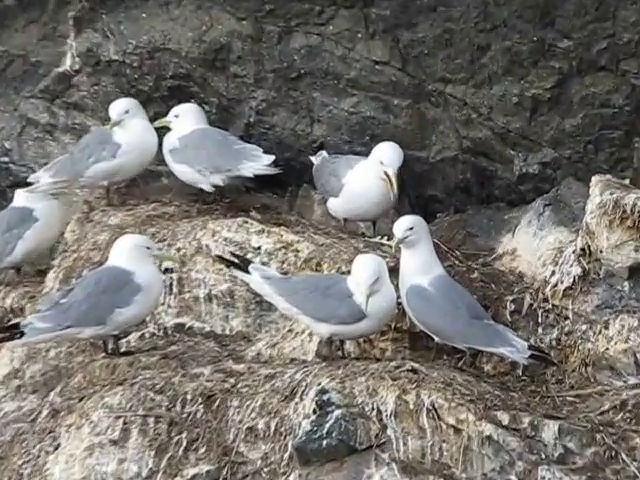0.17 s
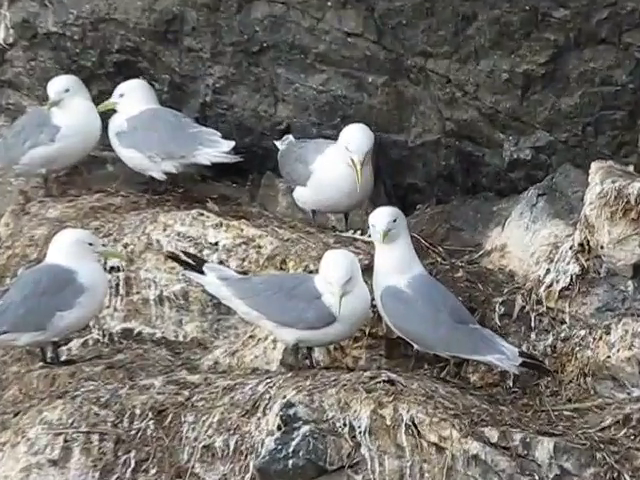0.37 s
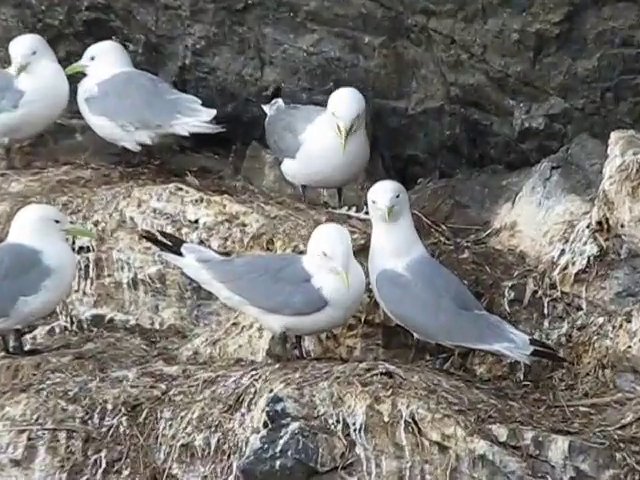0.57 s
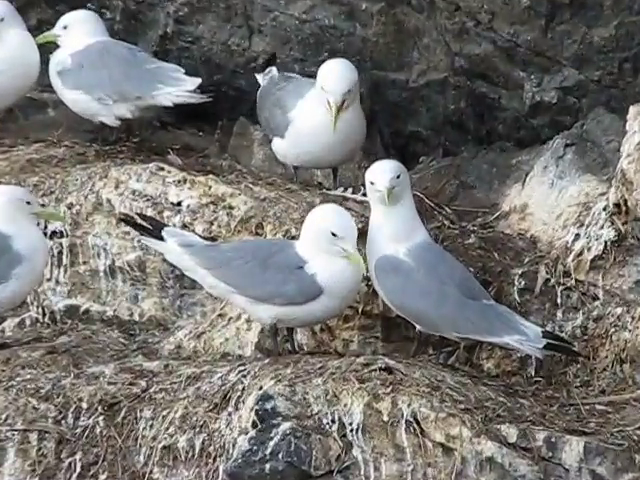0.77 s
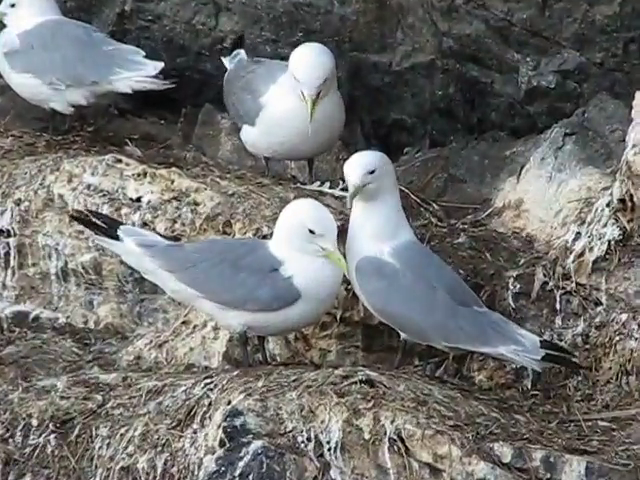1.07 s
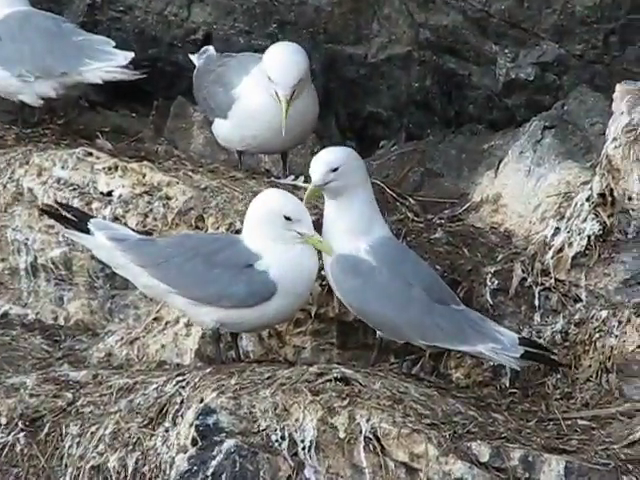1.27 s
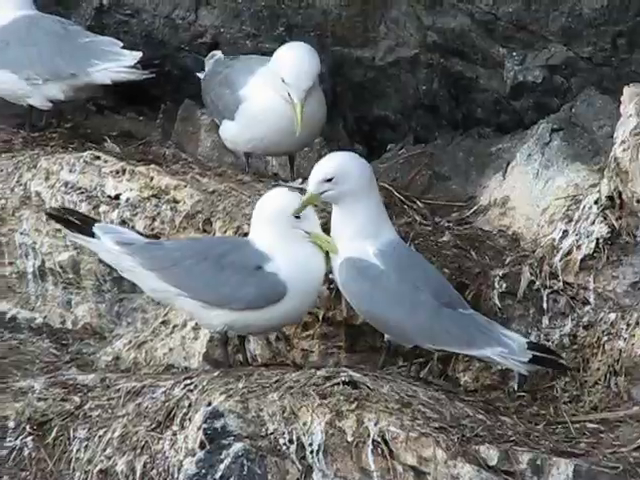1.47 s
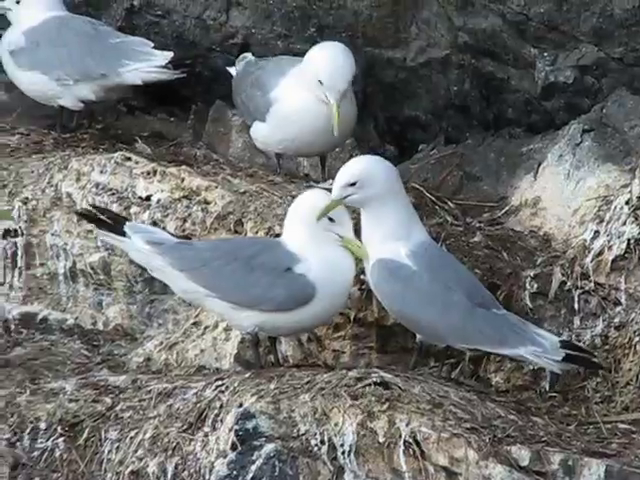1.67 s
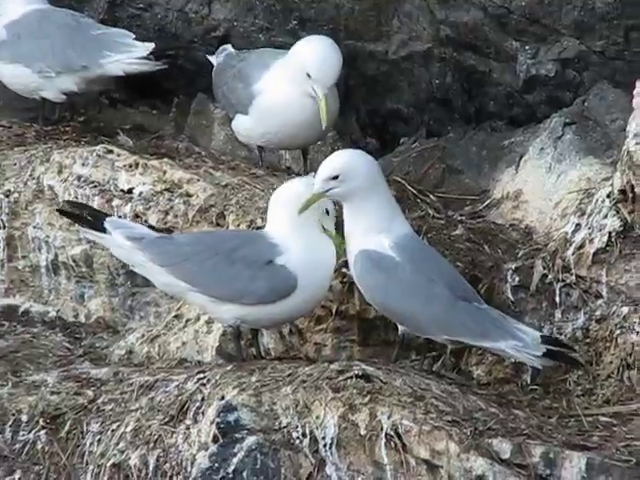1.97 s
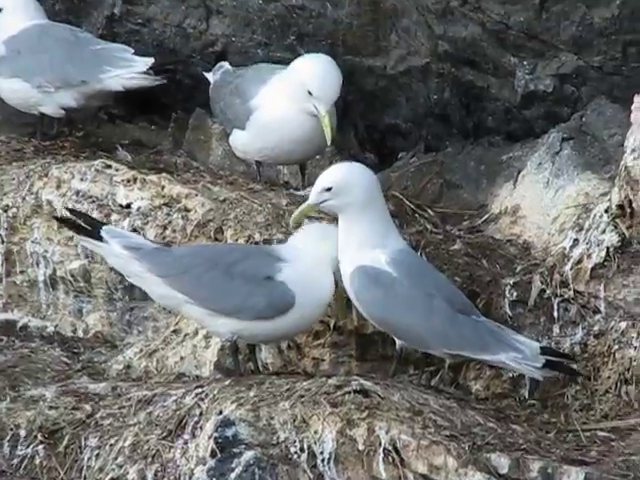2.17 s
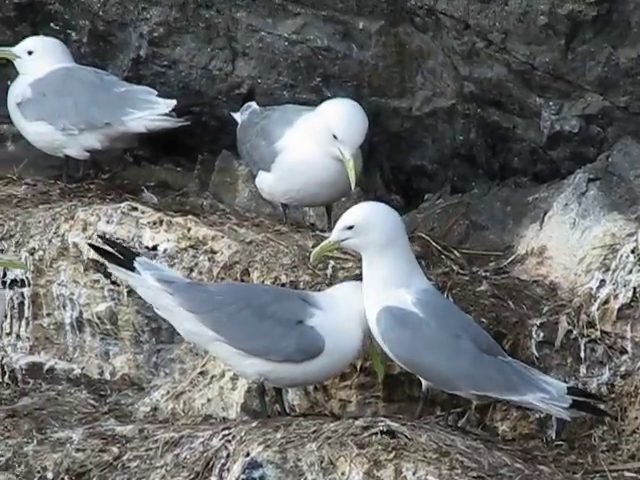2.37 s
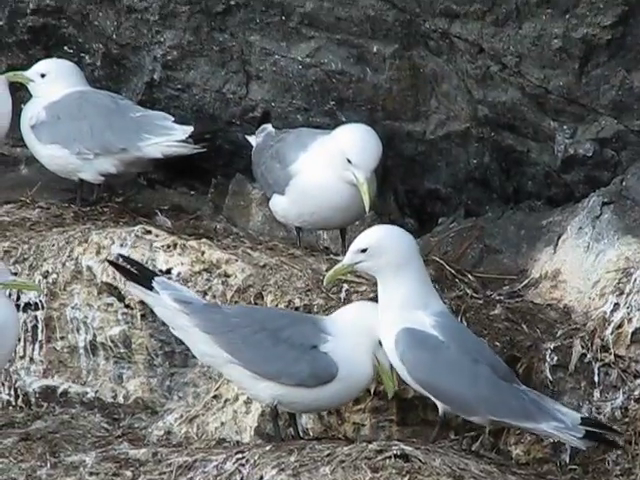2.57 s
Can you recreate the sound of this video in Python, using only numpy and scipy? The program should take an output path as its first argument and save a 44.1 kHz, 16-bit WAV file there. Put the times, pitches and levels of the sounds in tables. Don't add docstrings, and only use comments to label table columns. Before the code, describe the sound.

Gulls call in a dense, hoarse, overlapping chorus, with thin chick peeps and a soft surf roar

```python
import sys
import numpy as np
from scipy import signal
from scipy.fft import rfft, irfft, next_fast_len
from scipy.io import wavfile
from scipy.ndimage import uniform_filter1d

SR = 44100
rng = np.random.default_rng(int(sys.argv[2]) if len(sys.argv) > 2 else 0)


def level_to_linear(level):
    exponent = np.asarray(level, float) / 20
    return 10 ** exponent


def dump(signal):
    limited = np.clip(np.atleast_2d(signal).T, -1, 1)
    pcm = np.round(limited * 32767).astype(np.int16)
    wavfile.write(sys.argv[1], SR, pcm)


N = 120393
PAD = next_fast_len(N, True)
NEAR_DB = 1.8
EDGE_S = 0.014

# (frequency [Hz], level [dB])
THROAT_RESPONSE = [(600, -20), (1200, -7), (1700, 1), (2200, -5), (2800, 0), (4300, -2.5), (6000, -13),
                   (15000, -40)]


def note(length, db, hz, mouth_khz, far=False, slide=0, at=(0,)):
    t = np.arange(0, length + EDGE_S / 2, 1 / SR)
    pitch = uniform_filter1d(np.interp(t, at, np.atleast_1d(hz)), size=300)
    level_db = uniform_filter1d(np.interp(t, at, np.atleast_1d(db)), size=300)

    arch = 0.02 if len(at) == 1 else 0
    shake = 0.005 * np.interp(t * 200, np.arange(36), rng.standard_normal(36))
    bend = arch * (np.sin(np.pi * t / t[-1]) - 0.7) + slide * (t / t[-1] - 0.5)
    turns = np.cumsum(pitch * (1 + bend + shake)) / SR

    k = np.arange(1, 26)
    harmonic_hz = k * pitch.mean()
    chance = rng.standard_normal((25, 2))
    mouth_db = 9 * (0.55 if far else 1)
    octaves_off = np.log2(harmonic_hz / mouth_khz / 1000)
    harmonic_db = mouth_db * np.exp(-0.5 * (octaves_off / 0.3) ** 2) + 1.2 * chance[:, 0]
    if not far:
        harmonic_db = harmonic_db + read(THROAT_RESPONSE, harmonic_hz)
    gains = level_to_linear(harmonic_db) * (harmonic_hz < 16000)

    waves = np.cos((2 * np.pi * k[:, None] * turns + 9 * chance[:, 1:]).astype(np.float32))
    if not far:
        steps = rng.standard_normal((25, 10))
        flicker = np.array([np.interp(t * 50, np.arange(10), row) for row in steps])
        waves *= level_to_linear(3 * flicker)
    return level_to_linear(level_db) * swell(t, EDGE_S) * evened(gains @ waves)


# (start [s], length [s], level [dB], pitch [Hz], mouth resonance [kHz])
LEFT_NOTES = [(0.015, 0.06, -28, 499, 2.2), (0.09, .045, -26, 631, 2.0), (0.597, 0.035, -28, 876, 4.4),
              (0.837, 0.025, -27, 586, 2.0), (1.221, 0.043, -23, 635, 3.5), (1.356, 0.06, -33, 685, 4.8),
              (1.405, 0.03, -31, 604, 3.2), (1.696, .04, -28, 811, 1.7), (2.241, 0.065, -23, 731, 3.5),
              (2.458, 0.05, -30, 488, 3.6), (2.684, 0.05, -27, 607, 4.6)]
RIGHT_NOTES = [(0.627, 0.045, -23, 808, 3.4), (0.762, 0.06, -22, 637, 3.2), (1.11, 0.055, -24, 515, 2.6),
               (1.094, 0.045, -28, 838, 2.5), (1.515, 0.045, -25, 658, 3.2), (1.687, 0.04, -25, 675, 4.0),
               (2.076, .03, -28, 716, 2.2), (2.115, 0.062, -21, 640, 3.7)]
AHEAD_NOTES = [
    (1.153, .04, -25, 580, 2.7),
    (2.166, 0.034, -26, 568, 1.7),
    (2.418, 0.051, -26, 646, 1.9),
    (2.618, 0.036, -27, 580, 1.8),
]
RISING_NOTES = [
    (0.652, .025, -24, 604, 3.3),
    (.67, .03, -25, 690, 2.7),
    (1.556, .045, -24, 638, 3.2),
]


def near_notes(rows, slide=0):
    mix = np.zeros(N)
    for start, *row in rows:
        add(mix, start - EDGE_S / 4, note(*row, slide=slide))
    return level_to_linear(NEAR_DB) * mix


# (mouth resonance [kHz], left minus right [dB], [(time [s], pitch [Hz], level [dB])])
OPEN_CRIES = [(4.0, 0, [(.125, 532, -26), (.17, 538, -25), (.22, 545, -25)]), (2.9, 0, [(.262, 598, -29),
              (.3, 610, -26), (.33, 601, -25)]), (2.8, -2, [(.327, 545, -24), (.352, 562, -22),
              (.385, 560, -26)]), (2.8, -3, [(.535, 547, -26), (.56, 545, -25), (.587, 525, -27)]),
              (2.9, -4, [(.74, 575, -26), (.772, 558, -21), (.795, 542, -22), (.81, 562, -22),
              (.855, 565, -24)]), (2.25, -2, [(1.0, 475, -26), (1.025, 490, -24), (1.05, 494, -25),
              (1.062, 530, -23), (1.09, 562, -20), (1.13, 567, -24)]), (3.8, -1, [(1.178, 684, -23),
              (1.21, 685, -22), (1.235, 670, -26), (1.265, 645, -31)]),
              (3.6, -2, [(1.172, 568, -26), (1.2, 546, -24), (1.22, 536, -22), (1.247, 562, -20),
              (1.275, 570, -22), (1.297, 545, -26)]), (2.5, -1, [(1.428, 484, -25), (1.46, 500, -25),
              (1.474, 541, -24), (1.49, 539, -24), (1.514, 523, -28)]), (3.0, -3, [(1.6, 555, -24),
              (1.64, 530, -22), (1.665, 562, -21), (1.685, 570, -22), (1.745, 560, -25)]),
              (3.9, 1, [(1.69, 728, -28), (1.74, 758, -25), (1.785, 745, -29)]),
              (3.1, -2, [(1.928, 557, -24), (1.96, 590, -28), (2.0, 562, -25), (2.015, 548, -24),
              (2.045, 558, -21), (2.078, 530, -31)]), (3.1, -3, [(2.297, 537, -26), (2.34, 551, -22),
              (2.365, 556, -23), (2.385, 533, -25), (2.41, 546, -22), (2.457, 540, -26)]),
              (2.8, 0, [(2.595, 552, -23), (2.63, 570, -24), (2.668, 571, -28)]),
              (4.2, 2, [(2.627, 683, -27), (2.66, 664, -27), (2.695, 649, -31)])]
HALF_SHUT_CRIES = [
    (1.85, 1, [(.0, 625, -27), (.06, 650, -27), (.125, 650, -25), (.16, 620, -29)]),
    (1.8, 1, [(.19, 585, -28), (.24, 615, -26), (.29, 595, -27), (.33, 575, -28)]),
    (1.75, 1, [(.36, 570, -26), (.4, 580, -25), (.46, 625, -29), (.53, 655, -27)]),
    (1.7, 0, [(.58, 560, -28), (.63, 548, -25), (.675, 555, -26)]),
]


def cries():
    mix = np.zeros((2, N))
    for mouth_khz, side_db, rows in OPEN_CRIES + HALF_SHUT_CRIES:
        s, hz, db = np.transpose(rows)
        voice = note(s[-1] - s[0], db + NEAR_DB, hz, mouth_khz, at=s - s[0])
        place = 1 if side_db < -1.5 else 0
        add(mix[place], s[0], voice)
    return mix


# (start [s], length [s], level [dB])
CLAMOUR_BOUTS = [(0, 0.039, -19.5), (0.044, 0.2, -19.5), (0.279, 0.16, -17.5), (0.548, 0.2, -20),
                 (0.707, 0.21, -22), (1, 0.21, -22), (1.17, 0.14, -20.5), (1.417, 0.26, -22.5),
                 (1.573, 0.23, -23.5), (1.836, 0.26, -22), (2.12, 0.11, -23.5), (2.189, 0.16, -21.5),
                 (2.316, 0.32, -24), (2.54, 0.25, -27)]
# (frequency [Hz], level [dB])
RASP_SPECTRUM = [(600, -12), (1200, -7), (1650, -5.5), (2150, -3.5), (2900, -1), (4500, -5), (6500, -21),
                 (15500, -40.5)]


def ledge_clamour():
    level = np.zeros(N)
    for start, length, db in CLAMOUR_BOUTS:
        add(level, start, level_to_linear(db) * swell(np.arange(0, length, 1 / SR), 0.25 * length))
    return level * crowd(110, 0.35, RASP_SPECTRUM)


# (start [s], length [s], level [dB], first pitch [Hz], last pitch [Hz])
CHICK_PEEPS = [(0.275, 0.041, -48, 8620, 8500), (.3, .03, -50, 8600, 8470), (0.707, 0.021, -36, 6850, 6720),
               (1.085, 0.019, -41, 6740, 6760), (1.112, 0.027, -40, 6700, 6900),
               (1.08, 0.037, -49, 8400, 8300), (1.565, .045, -41, 6900, 6900),
               (1.962, .04, -48, 6700, 6650), (2.015, 0.042, -44, 6830, 6830),
               (2.35, 0.032, -49, 8650, 8200)]


def chick_peeps():
    mix = np.zeros(N)
    for start, length, db, hz, end_hz in CHICK_PEEPS:
        t = np.arange(0, length, 1 / SR)
        turns = np.cumsum(hz + (end_hz - hz) * t / length) / SR
        add(mix, start, level_to_linear(db + 6) * swell(t, 0.0063) * np.sin(2 * np.pi * turns))
    return mix


# (start [s], level [dB], top pitch [Hz])
CHICK_SQUEAKS = [
    (.396, -28.5, 1645),
    (.903, -27.5, 1760),
    (1.378, -40, 1615),
]
SQUEAK_HARMONICS = [-22, -9, 0, -9, -10, -21, -19, -19, -21]


def chick_squeaks():
    mix = np.zeros(N)
    for start, db, hz in CHICK_SQUEAKS:
        length = 0.055
        t = np.arange(0, length, 1 / SR)
        fall = 0.125 * abs(t / length - 0.2) ** 2.2 * 1.6
        turns = np.cumsum(hz * (1 - fall)) / SR
        tone = sum(level_to_linear(g) * np.sin(2 * np.pi * (k + 1) * turns) for k, g in enumerate(SQUEAK_HARMONICS))
        add(mix, start, level_to_linear(db + 3) * swell(t, 0.011) * tone)

        t = np.arange(1500) / SR
        band = signal.butter(2, [4000, 11000], "band", fs=SR)
        hiss = signal.lfilter(*band, rng.standard_normal(1500))
        add(mix, start - 0.047, level_to_linear(db - 8) * swell(t, 0.0024) * hiss)
    return mix


def crowd(per_s, noise_share, spectrum):
    voices = np.zeros(N)
    for at, long, loud, high, mouth, up in rng.random((round(per_s * N / SR), 6)):
        hz, mouth_khz = 490 + 380 * high ** 2, 1.0 + 4.9 * mouth
        slide = 0.18 * (up - 0.4)
        add(voices, at * N / SR, note(0.021 + 0.0496 * long, 3 * loud, hz, mouth_khz, True, slide))
    gusts = evened(uniform_filter1d(rng.standard_normal(N), size=300))
    rasp = rng.standard_normal(N) * level_to_linear(3.5 * gusts)
    mix = np.sqrt(1 - noise_share) * evened(voices) + np.sqrt(noise_share) * evened(rasp)
    return evened(colour(mix, spectrum))


# (frequency [Hz], level [dB])
FAR_SPECTRUM = [(500, -24), (1250, -1), (1800, 2), (2700, -2.5), (4700, -5), (6500, -26), (10000, -32),
                (15500, -45)]


def far_colony():
    return level_to_linear(-23.5) * crowd(180, 0.4, FAR_SPECTRUM)


# (frequency [Hz], level [dB])
SURF_SPECTRUM = [(20, -36), (45, -13), (130, -10.5), (330, -2), (650, 0), (900, -5), (3000, 0.5),
                 (15000, -47.5)]
# (time [s], level [dB])
SURF_LEVEL = [
    (0.0, -23),
    (1.79, -27),
    (2.73, -26.5),
]


def surf():
    s, db = np.transpose(SURF_LEVEL)
    wash = level_to_linear(np.interp(np.arange(N) / SR, s, db))
    return wash * evened(colour(rng.standard_normal(N), SURF_SPECTRUM))


def rock(x, t60):
    t = np.arange(SR // 2) / SR
    taps = (rng.random(len(t)) < 0.05) * rng.standard_normal(len(t)) * level_to_linear(-60 * t / t60)
    return signal.fftconvolve(x, taps / np.linalg.norm(taps))[:N]


# (frequency [Hz], coherence [0 to 1])
PORT_COHERENCE = [(60, .99), (400, .96), (900, .85), (2000, .3), (5000, .35), (15000, .4)]
# (frequency [Hz], phase [rad])
PORT_LAG = [(60, 0.), (500, .1), (1600, .4), (3100, 1.2), (5700, 1.5), (12700, 1.9)]
# (frequency [Hz], left minus right [dB])
PORT_TILT = [(60, 3), (150, 0), (380, 1), (950, 2), (2380, -0.5), (5980, 6.5), (15000, 0)]


def ports(x, other, side_db):
    hz, z = np.fft.rfftfreq(PAD, 1 / SR), rfft(x, PAD)
    same = np.clip(read(PORT_COHERENCE, hz), 0, 1)
    tilt = level_to_linear((read(PORT_TILT, hz) + side_db) / 2)
    right = same * z + np.sqrt(1 - same ** 2) * rfft(other, PAD)
    right = right * np.exp(-1j * read(PORT_LAG, hz))
    return irfft(np.array([z * tilt, right / tilt]), PAD)[:, :N]


def placed(x, side_db, direct):
    wet = [x + level_to_linear(-16) * rock(x, 0.15) for _ in range(2)]
    other = direct * wet[1] + (1 - direct) * rock(x, 0.014)
    return ports(wet[0], other, side_db)


def read(points, hz):
    f, value = np.transpose(points)
    return np.interp(np.log(hz + 1), np.log(f + 1), value)


def evened(x):
    return x / np.sqrt(np.mean(x ** 2) + 1e-20)


def add(mix, s, sound):
    part = mix[max(round(s * SR), 0):][:len(sound)]
    part += sound[:len(part)]


def colour(x, spectrum):
    gain = level_to_linear(read(spectrum, np.fft.rfftfreq(PAD, 1 / SR)))
    return irfft(rfft(x, PAD) * gain, PAD)[:N]


def swell(t, edge):
    return np.sin(np.pi / 2 * np.clip(np.minimum(t, t[-1] - t) / edge, 0, 1)) ** 2


def scene():
    clear = 0.68
    left_cries, right_cries = cries()
    left = near_notes(LEFT_NOTES) + left_cries
    right = near_notes(RIGHT_NOTES, 0.008) + right_cries
    ahead = near_notes(AHEAD_NOTES) + near_notes(RISING_NOTES, 0.045) + chick_peeps() + chick_squeaks()
    mix = placed(left, 0.6, clear) + placed(right, -4, clear) + placed(ahead, 0, clear)
    mix += placed(ledge_clamour(), -1.9, 0)
    far = far_colony()
    return mix + ports(surf() + far, surf() + rock(far, 0.05), -0.49)


def low_pass(x):
    return signal.sosfilt(signal.butter(12, 15610, fs=SR, output="sos"), x)


def record(dry):
    ceiling = 1.8
    mix = ceiling * np.tanh(dry / ceiling)
    return low_pass(mix)


dry = scene()
out = record(dry)
dump(out)
```